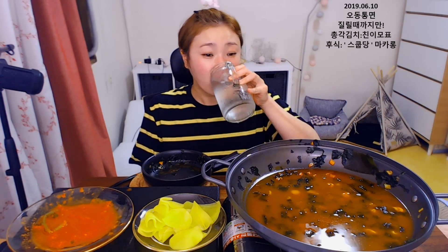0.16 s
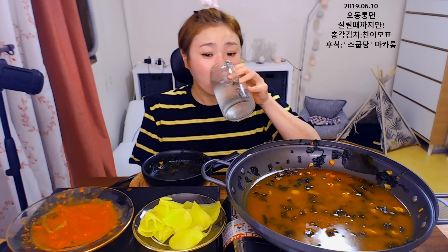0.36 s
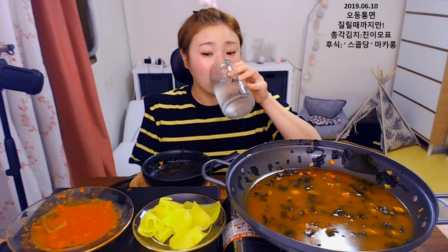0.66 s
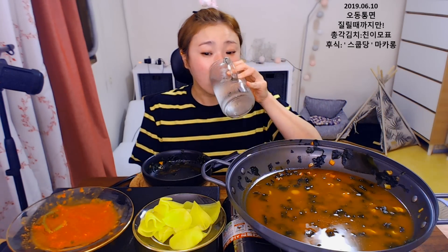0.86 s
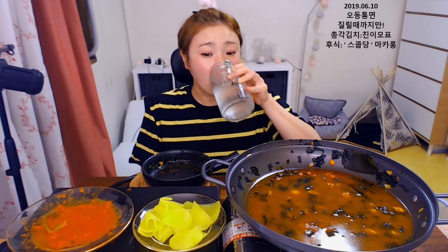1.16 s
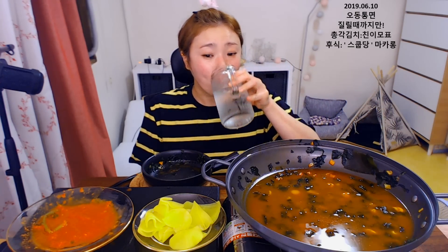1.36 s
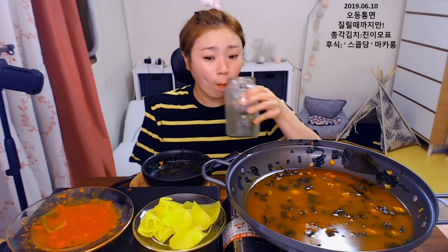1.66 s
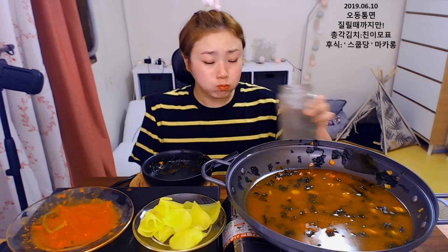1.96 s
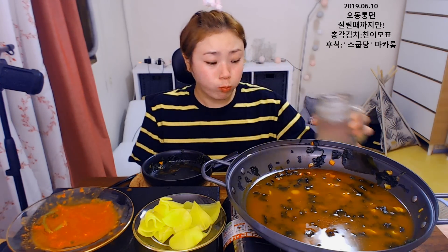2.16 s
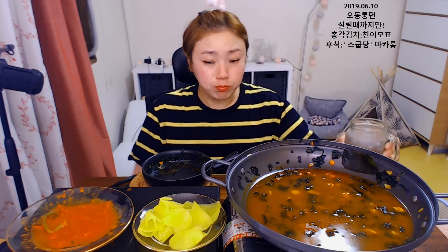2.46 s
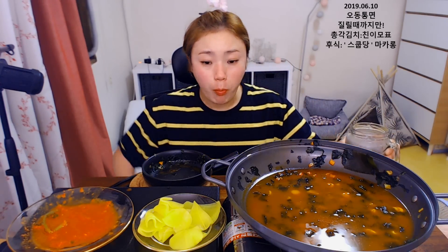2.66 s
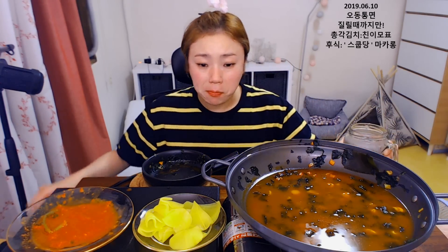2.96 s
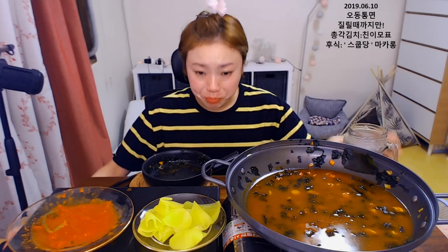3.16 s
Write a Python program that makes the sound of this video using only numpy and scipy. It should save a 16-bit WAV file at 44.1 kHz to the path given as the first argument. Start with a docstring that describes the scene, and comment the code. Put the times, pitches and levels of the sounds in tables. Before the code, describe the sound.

A glass mug lands on a wooden table with one sharp knock after light ice clinks.

```python
"""A glass mug lands on a wooden table with one sharp knock, rocks onto its base and scrapes briefly.
Before that, a sip ends with wet smacks and a fizz, and ice clinks lightly as the mug is lowered.
Knocks, clinks and smacks are fading tones plus short shaped pulses or noise; scrapes and fizz are
runs of tiny clicks. A small quiet room adds echoes and a steady tone, through one close microphone."""
import sys
import numpy as np
from scipy import signal
from scipy.fft import rfft, irfft
from scipy.io import wavfile
from scipy.ndimage import uniform_filter1d

SR = 44100
rng = np.random.default_rng(int(sys.argv[2]) if len(sys.argv) > 2 else 0)


def output_pcm(signal):
    """Save a mono or channel-first signal as 16-bit PCM at the path in sys.argv[1].

    Samples are clipped to [-1, 1] before scaling.
    """
    pcm = np.clip(np.atleast_2d(signal).T, -1, 1) * 32767
    wavfile.write(sys.argv[1], SR, np.round(pcm).astype(np.int16))


N = 145530  # length in samples, 3.3 s

# All levels in the tables are relative. A t60_s is the time a sound takes to fade by 60 dB.

# Steady room noise: pitch_hz, level_db (per Hz)
AIR_COLOUR = [(12, -44), (20, -13.5), (48, 2.5), (63, -5.5), (86, -14), (163, -9), (204, -16), (270, -2.5),
              (399, -13.5), (434, -10.5), (923, -8), (2080, -17), (3530, -19.5), (4180, -24.5),
              (10500, -30.5), (11400, -34), (16000, -37)]
AIR_DB = -54
WHINE_HZ, WHINE_WIDTH_HZ, WHINE_DB = 11250, 110, -78.5

# How fast the room's reflections fade: pitch_hz, t60_s
ROOM_DECAY = [(60, 0.99), (250, 0.2), (600, 0.23), (1500, 0.25), (4000, .24), (9000, 0.17), (15000, 0.13)]
# First reflections of the knock: delay_s, gain (plain factor)
FIRST_ECHOES = [(.0054, 0.29), (.0088, 0.29), (0.0119, .1), (0.0285, 0.042)]
ROOM_ONSET_S = 0.0045  # build-up time of the reflections and of the table's ringing
ICE_WET_DB, SMACK_WET_DB, SCRAPE_WET_DB, FIZZ_WET_DB = -8, -8, -7, -5  # reverberation levels

# Scrapes on the table: start_s, length_s, level_db, tilt_db_per_octave (above 1 kHz)
SCRAPE_RUNS = [(2.779, 0.019, -45.5, -4), (2.815, 0.0056, -36.5, -1.5), (2.8233, 0.017, -40, 0.5),
               (2.86, .013, -47.5, 1.5), (2.872, 0.0224, -41, 1), (2.92, 0.0054, -38, 0.5),
               (2.949, 0.013, -53.5, 1), (3.002, 0.039, -50.5, 0)]
# Tone colour of the scraping: pitch_hz, level_db
SCRAPE_COLOUR = [(150, -2.5), (700, 6.5), (1130, 13), (1600, 1.5), (3000, 1), (4200, -6.5), (6200, 1),
                 (8000, -9.5), (10500, -11), (15000, -20.5)]
SLIPS_PER_S, SLIP_SPREAD_DB = 3000, 3

# Crackling water film and its rub on the rim: start_s, length_s, level_db, centre_hz, width_octaves
FIZZ_RUNS = [(0.2, 0.015, -39, 9130, 0.26), (0.226, 0.053, -54, 8400, 0.48), (0.2, 0.06, -48.5, 890, 0.62),
             (0.22, 0.046, -50.5, 2950, 0.34), (.275, .17, -55.5, 1830, 0.02),
             (.335, 0.057, -56, 12600, 0.66), (0.4, 0.0098, -47, 12700, 0.13),
             (0.39, 0.028, -59, 10000, 0.45)]
FIZZ_PER_S, FIZZ_SPREAD_DB = 1800, 7.5

# Wet smacks and drips: start_s, pitch_hz, t60_s, level_db, hollow_db
WET_SMACKS = [(.1917, 9400, 0.0064, -43, -35), (0.2059, 2460, .008, -37, -32.5),
              (0.2084, 6900, 0.0039, -25.5, -66), (0.209, 9400, 0.0036, -19, -45),
              (0.22, 3150, 0.017, -37.5, -45), (.224, 890, 0.013, -43, -43), (.241, 776, 0.06, -43, -52),
              (0.2521, 6270, 0.0098, -26, -42.5), (0.252, 7460, 0.0097, -27.5, -58),
              (.262, 1760, .01, -38, -53), (0.2752, 6500, .006, -29, -43.5),
              (0.338, 6370, 0.0016, -43, -46.5), (0.356, 6300, 0.0016, -40, -44),
              (.369, 6240, 0.0044, -41, -46), (0.421, 12100, .02, -48, -50.5),
              (0.955, 2350, .03, -45.5, -63), (1.697, 8000, 0.00043, -35.5, -53.5),
              (1.758, 6400, 0.011, -47.5, -62), (1.815, 1020, 0.0091, -35, -58),
              (1.884, 6300, 0.011, -48, -47), (2.2843, 1010, 0.011, -39.5, -47)]
# Tones of the hollow behind the smacks: pitch_hz, level_db, t60_s
HOLLOW_TONES = [(1045, -14, 0.041), (1878, 1, 0.032), (2350, -16.5, 0.036), (2580, -1.5, 0.042),
                (3200, -24, 0.036)]
SMACK_ROUGHNESS = 0.51  # strength of the random flutter, as a plain factor
SNAP_DB, SNAP_T60_S = 2, 0.0095

# Ice taps on the glass: start_s, rim_hz, rim_db, wall_db, upper_wall_db, tick_db
ICE_TAPS = [(0.516, 1836, -55.5, -83, -81, -72), (0.5557, 1850, -60, -78, -87, -74),
            (0.664, 1830, -61, -78, -83, -69), (0.936, 1820, -69, -64, -64.5, -72),
            (1.0708, 1850, -58.5, -62, -68, -67), (1.1446, 1840, -67, -60, -69, -63.5),
            (1.2263, 1840, -49.5, -57, -56, -54.5), (1.2803, 1885, -54, -74, -57.5, -58.5),
            (1.3048, 1882, -53, -72, -75, -72), (1.327, 1970, -68, -73, -65, -66),
            (1.3621, 1917, -41.5, -52, -58, -55.5), (1.386, 1883, -50, -74, -70, -66),
            (1.4147, 1867, -55.5, -74, -67, -69), (1.443, 1920, -60, -75, -68, -73),
            (1.4786, 1860, -40, -58.5, -67, -57.5), (1.537, 1820, -52.5, -87, -81, -61),
            (1.557, 1890, -71, -76, -57, -70), (1.572, 1970, -60, -74, -52.5, -60),
            (1.8047, 1933, -44, -77, -59, -48), (1.8387, 1850, -50.5, -66, -67, -68),
            (1.849, 1860, -52.5, -68, -59, -68), (1.9213, 1930, -63, -76, -63, -75),
            (1.9445, 1845, -55, -60, -66, -69), (1.987, 1938, -56, -57, -64, -58),
            (1.995, 1910, -56, -58, -55.5, -72), (2.1241, 1932, -39.5, -31.5, -47, -54),
            (2.2109, 1916, -48, -40, -55, -57.5), (2.2401, 1896, -50, -52, -75, -67),
            (2.267, 1960, -60, -63, -70, -65), (3.02, 1950, -50, -58, -63, -63),
            (3.079, 1948, -52, -48.5, -65, -68)]
RIM_DB, RIM_T60_S, RIM_RISE_S = 14.5, 0.058, 0.001
# Low tones of the glass wall: pitch_hz, level_db, t60_s
WALL_TONES = [(2450, -21, 0.048), (2940, 0, 0.022), (3583, 10, 0.047)]
# Upper tones of the glass wall, before random detuning: pitch_hz, level_db, t60_s
UPPER_WALL_TONES = [(3820, 2.5, 0.062), (4130, -6, 0.083), (4140, 0.5, 0.1)]
# Quickly dying tones heard as a tick, before random detuning: pitch_hz, level_db, t60_s
TICK_TONES = [(2287, 1.5, 0.075), (6160, 6, 0.032), (6110, 0, 0.021), (6560, 3.5, 0.036), (7000, -3, 0.031),
              (8890, -27, 0.036), (10550, -13.5, 0.04), (12330, -11, .035)]
# Tone colour of a contact with the glass, also used for the wet snaps: pitch_hz, level_db
CONTACT_COLOUR = [(300, -17), (1200, -7), (2500, 5.5), (4800, -2), (6400, 9.5), (8800, -8), (10800, -0.5),
                  (13000, -20), (16000, -24)]
CONTACT_DB, CONTACT_T60_S = 10.5, 0.037

# Mug on the table: start_s, level_db, dulling_db_per_octave (above 800 Hz),
# ring_db (table and room), damping_db_per_s (added to their own fading)
MUG_KNOCKS = [(2.5323, 1, -0.5, -0.5, 3), (2.6683, -17.5, -14.5, 4, 55)]
# Tone colour of the blow: pitch_hz, level_db
BLOW_COLOUR = [(40, -42), (150, -29), (260, -8), (500, -2), (713, 4), (950, -6), (1120, 0), (1450, -12),
               (1620, -2), (1900, -23), (2600, -26), (3300, -54), (6000, -47), (15000, -68)]
BLOW_DB = 26.5
BEND_S = 0.000525  # travel time of bending waves in the wood at 1 kHz; low notes arrive later
# Tones of the table with the mug on it, before the extra damping: pitch_hz, level_db, t60_s
TABLE_TONES = [(63, -31.5, 0.21), (102, -62, 0.22), (212.2, -33, 0.54), (320, -40, 0.19),
               (434, -20.5, 0.17), (507, -21.5, 0.19), (576, -22.5, 0.23), (698.6, -28, .14),
               (780, -37, 0.4), (960, -38, 0.082), (1150, -22.5, 0.14), (1297, -15, 0.063),
               (5170, -38.5, 0.094)]
TABLE_DB = 1
# Tone colour of the knock as the room returns it: pitch_hz, level_db
BOOM_COLOUR = [(40, -16), (150, -12), (280, 4), (600, 2.5), (1100, -8), (1600, -12.5), (2200, -15.5),
               (3200, -27), (4300, -27.5), (5300, -30.5), (8000, -34), (15000, -39)]
BOOM_DB = 21

EDGE_HZ = 15950  # upper limit of the recorder

T = np.arange(SR // 2) / SR  # half a second of time, the span of each single event
HZ = np.fft.rfftfreq(4096, 1 / SR)  # frequencies at which short pulses are shaped


def amp(db):
    """Turns decibels into a plain gain."""
    return 10 ** (np.asarray(db) / 20)


def unit(x):
    """Scales a sound to an average (rms) strength of 1."""
    return x / np.sqrt(np.mean(x ** 2) + 1e-20)


def read(points, hz):
    """Reads between the points of a table, with pitch on a logarithmic scale."""
    f, value = np.transpose(points)
    return np.interp(np.log(hz + 1), np.log(f + 1), value)


def add(mix, start_s, sound):
    """Mixes a sound in at its start time, cutting what runs past the end."""
    part = mix[round(start_s * SR):][:len(sound)]
    part += sound[:len(part)]


def noise():
    """Half a second of plain random noise."""
    return rng.standard_normal(len(T))


def fade(t60_s):
    """A smooth fade that falls by 60 dB in t60_s."""
    return np.exp(-np.log(1000) * T / t60_s)


def ring(tones, detune=0.):
    """A struck object rings in several fading tones, each a little off its pitch if detune is set."""
    out = np.zeros(len(T))
    for pitch_hz, level_db, t60_s in tones:
        actual_hz = pitch_hz * (1 + detune * rng.standard_normal())
        out += amp(level_db) * fade(t60_s) * np.sin(2 * np.pi * actual_hz * T)
    return out


def pulse(colour_db):
    """The most compact pulse with this tone colour that starts at time zero (minimum phase)."""
    cepstrum = irfft(colour_db * np.log(10) / 20)
    half = len(cepstrum) // 2
    # folding the second half onto the first puts the energy as early as possible
    cepstrum[1:half] *= 2
    cepstrum[half + 1:] = 0
    return irfft(np.exp(rfft(cepstrum)))


def through(x, response):
    """Passes a sound through a response and keeps its length."""
    return signal.fftconvolve(x, response)[:len(x)]


def tail():
    """Scattered room reflections of total energy 1, each pitch range fading at its own speed."""
    hz, frame_s, bands = signal.stft(rng.choice([-1., 1.], len(T)), SR, nperseg=256)
    decay = np.exp(-np.log(1000) * frame_s / read(ROOM_DECAY, hz)[:, None])
    x = signal.istft(bands * decay, SR)[1][:len(T)]
    x *= 1 - np.exp(-(T / ROOM_ONSET_S) ** 4)
    return x / np.linalg.norm(x)


def in_room(x, wet_db):
    """The direct sound plus its reverberation."""
    return x + amp(wet_db) * through(x, tail())


def crackle(length_s, clicks_per_s, spread_db, colour_db):
    """Tiny clicks at random times, shaped to one tone colour and scaled to rms 1 over the run."""
    happens = rng.random(len(T)) < clicks_per_s / SR
    size = amp(spread_db * noise())
    sign = rng.choice([-1., 1.], len(T))
    outline = abs(np.sin(np.pi * T / length_s)) ** 0.1 * (T < length_s)
    x = through(happens * size * sign * outline, pulse(colour_db))
    return x * np.sqrt(length_s * SR) / (np.linalg.norm(x) + 1e-12)


def room_tone():
    """Steady air noise and a thin electrical whine, which is noise in a very narrow band."""
    hz = np.fft.rfftfreq(N, 1 / SR)
    air = irfft(rfft(rng.standard_normal(N)) * amp(read(AIR_COLOUR, hz)), N)
    whine_shape = 1 / (1 + ((hz - WHINE_HZ) / WHINE_WIDTH_HZ) ** 2)
    whine = irfft(rfft(rng.standard_normal(N)) * whine_shape, N)
    return amp(AIR_DB) * unit(air) + amp(WHINE_DB) * unit(whine)


def scrapes():
    """The mug scrapes in short runs of tiny slips over the table top."""
    out = np.zeros(N)
    for start_s, length_s, level_db, tilt_db in SCRAPE_RUNS:
        octaves_up = np.log2(np.maximum(HZ / 1000, 1))
        colour_db = read(SCRAPE_COLOUR, HZ) + tilt_db * octaves_up
        run = crackle(length_s, SLIPS_PER_S, SLIP_SPREAD_DB, colour_db)
        add(out, start_s, amp(level_db) * run)
    return in_room(out, SCRAPE_WET_DB)


def fizz():
    """The water film crackles as the sip ends, each run of clicks centred on one pitch range."""
    out = np.zeros(N)
    for start_s, length_s, level_db, centre_hz, width_octaves in FIZZ_RUNS:
        octaves_away = np.log2((HZ + 1) / centre_hz)
        colour_db = -20 * np.log10(1 + (octaves_away / width_octaves) ** 2)
        run = crackle(length_s, FIZZ_PER_S, FIZZ_SPREAD_DB, colour_db)
        add(out, start_s, amp(level_db) * run)
    return in_room(out, FIZZ_WET_DB)


def smacks():
    """Films of water snap: a small rough tone, a burst of noise and the hollow ringing behind it."""
    out = np.zeros(N)
    for start_s, pitch_hz, t60_s, level_db, hollow_db in WET_SMACKS:
        flutter = 1 + SMACK_ROUGHNESS * unit(uniform_filter1d(noise(), size=30))
        swell = np.sqrt(T) * fade(t60_s)
        swell /= swell.max()
        pop = amp(level_db) * swell * flutter * np.sin(2 * np.pi * pitch_hz * T)
        snap = through(fade(SNAP_T60_S) * noise(), pulse(SNAP_DB + read(CONTACT_COLOUR, HZ)))
        hollow = ring(HOLLOW_TONES, detune=0.031)
        add(out, start_s, in_room(pop + amp(hollow_db) * (hollow + snap), SMACK_WET_DB))
    return out


def ice():
    """Ice taps the hand-damped glass; each spot wakes other tones, and tilting water shifts the rim's pitch."""
    out = np.zeros(N)
    for start_s, rim_hz, rim_db, wall_db, upper_wall_db, tick_db in ICE_TAPS:
        rim = ring([(rim_hz, RIM_DB + rim_db, RIM_T60_S)])
        rim *= 1 - np.exp(-T / RIM_RISE_S)
        wall = amp(wall_db) * ring(WALL_TONES)
        upper_wall = amp(upper_wall_db) * ring(UPPER_WALL_TONES, detune=0.0058)
        grit = through(fade(CONTACT_T60_S) * noise(), pulse(CONTACT_DB + read(CONTACT_COLOUR, HZ)))
        tick = amp(tick_db) * (ring(TICK_TONES, detune=0.014) + grit)
        add(out, start_s, in_room(rim + wall + upper_wall + tick, ICE_WET_DB))
    return out


def knocks():
    """The heavy base hits the table: a blow, its first echoes, the table's ringing and the room."""
    out = np.zeros(N)
    for start_s, level_db, dulling_db, ring_db, damping_db in MUG_KNOCKS:
        # one filter sets both the strength and the dullness of this knock
        softness = pulse(level_db + dulling_db * np.log2(np.maximum(HZ / 800, 1)))
        # bending waves: the delay grows towards low pitches
        bending = np.exp(-4j * np.pi * BEND_S * np.sqrt(HZ * 1000))
        impact = pulse(BLOW_DB + read(BLOW_COLOUR, HZ))
        blow = through(irfft(rfft(impact) * bending), softness)
        add(out, start_s, -blow)
        for delay_s, gain in FIRST_ECHOES:
            add(out, start_s + delay_s, -gain * blow)
        table = amp(TABLE_DB) * ring(TABLE_TONES) * (1 - np.exp(-(T / ROOM_ONSET_S) ** 2))
        boom = through(tail(), pulse(BOOM_DB + read(BOOM_COLOUR, HZ)))
        add(out, start_s, amp(ring_db - damping_db * T) * through(table + boom, softness))
    return out


def scene():
    """Everything reaches one microphone, nearly equal on both channels."""
    mix = room_tone() + scrapes() + fizz() + smacks() + ice() + knocks()
    return mix * amp([[-.1], [.1]])  # channel levels in dB


def record(dry):
    """The recorder passes only what lies below its upper frequency limit."""
    low_pass = signal.firwin(511, EDGE_HZ, window=("kaiser", 9), fs=SR)
    return signal.oaconvolve(dry, low_pass[None], "same")


dry = scene()
out = record(dry)
output_pcm(out)
```